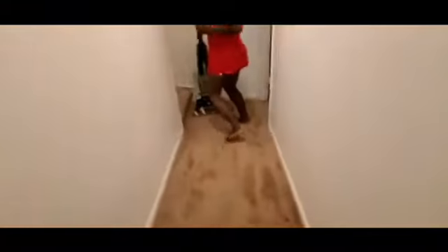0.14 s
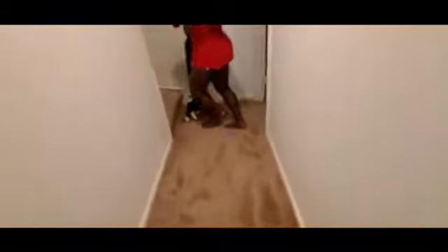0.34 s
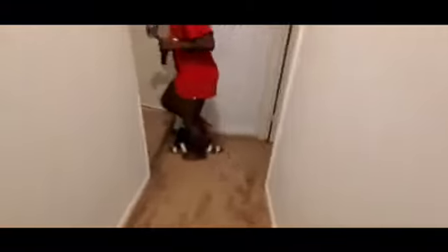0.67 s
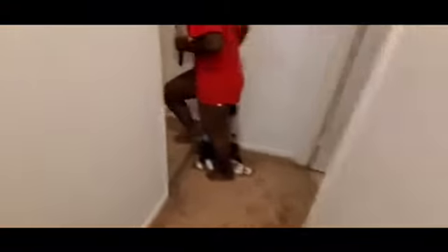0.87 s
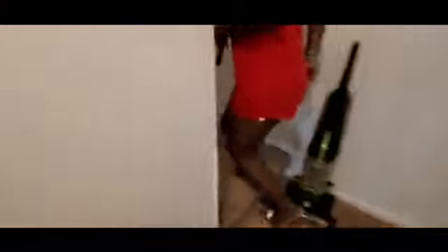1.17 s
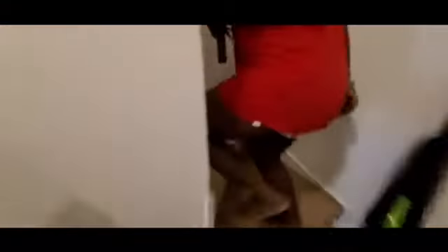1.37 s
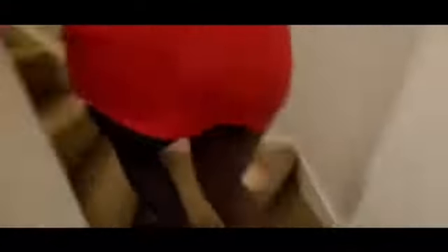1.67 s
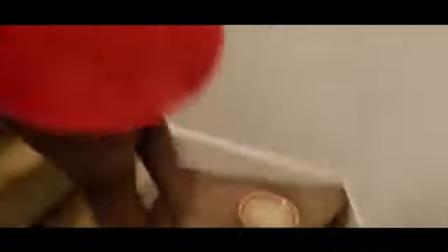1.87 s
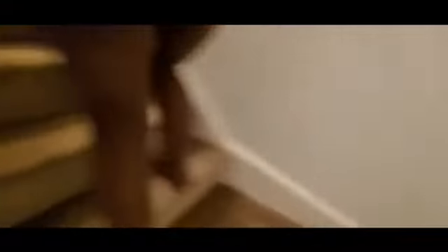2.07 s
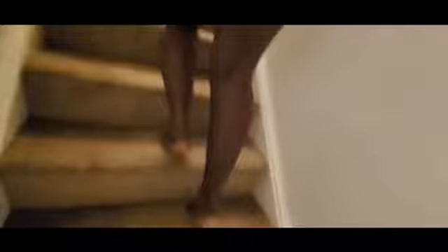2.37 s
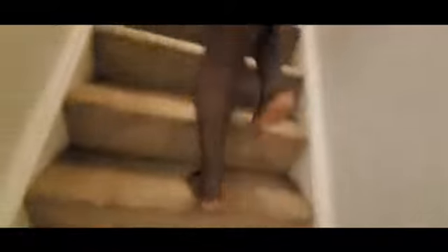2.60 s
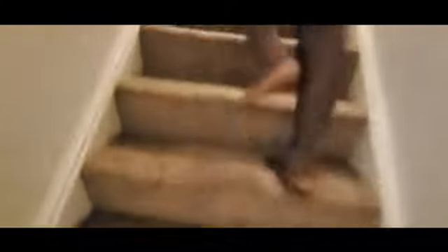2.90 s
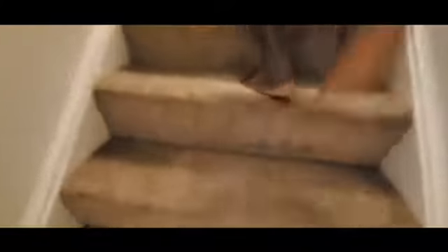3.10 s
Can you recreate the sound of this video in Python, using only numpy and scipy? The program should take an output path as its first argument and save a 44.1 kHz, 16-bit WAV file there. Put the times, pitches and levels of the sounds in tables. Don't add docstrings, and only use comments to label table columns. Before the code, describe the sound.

Soft footfalls and faint scuffs come first, then a few board knocks, then a dense run of hollow stair thumps and creaky cracks, with low handling rumble and a short indoor echo on a phone microphone.

```python
import sys
import numpy as np
from scipy import signal
from scipy.fft import rfft, irfft
from scipy.io import wavfile
from scipy.ndimage import uniform_filter1d

SR = 44100
rng = np.random.default_rng(int(sys.argv[2]) if len(sys.argv) > 2 else 0)


def makeup_ratio(level_db):
    decades = np.asarray(level_db, float) / 20
    return 10 ** decades


def generate_wav(sig):
    pcm = np.round(np.clip(np.atleast_2d(sig).T, -1, 1) * 32767).astype(np.int16)
    wavfile.write(sys.argv[1], SR, pcm)


N = 143325


def colour(x, points):
    p = np.array(points, float)
    size = 4096
    hz = np.maximum(np.arange(size // 2 + 1) * SR / size, 1)
    level_db = np.interp(np.log(hz), np.log(p[:, 0]), p[:, 1], -70, -70)
    cepstrum = irfft(level_db * np.log(10) / 20)
    cepstrum[1:size // 2] *= 2
    cepstrum[size // 2 + 1:] = 0
    ir = irfft(np.exp(rfft(cepstrum)))
    ir = ir / np.sqrt(np.sum(ir ** 2))
    return signal.fftconvolve(x, ir[None], axes=1)[:, :N]


def walk(rate):
    hold = int(SR / rate)
    steps = np.repeat(rng.standard_normal(N // hold + 1), hold)
    return uniform_filter1d(steps, hold)[:N]


def ports(alike):
    alike = np.clip(alike, 0, 1)
    noise = rng.standard_normal((3, N))
    return np.sqrt(alike) * noise[0] + np.sqrt(1 - alike) * noise[1:]


def add(out, s, x):
    i = max(int(s * SR), 0)
    out[..., i:i + x.shape[-1]] += x[..., :N - i]


def left_right(pan_db):
    return makeup_ratio(np.array([[pan_db], [-pan_db]]) / 2)


def hush_and_handling():
    # f/Hz, level/dB
    hush_tone = [(120, -62), (200, -30), (424, -4), (883, -12), (7410, -18.5), (9230, -20.5), (13300, -14),
                 (16000, -15)]
    # t/s, level/dB
    shake_level = [
        (0, -55),
        (.5, -44.5),
        (.9, -45),
        (1.2, -47.5),
        (1.7, -38.5),
        (1.9, -49),
        (2.3, -41),
        (2.6, -42.5),
        (3.1, -38),
    ]
    # f/Hz, level per Hz/dB
    shake_tone = [(11, -32), (18, -7.5), (39, 8), (119, -12.5), (152, -16), (260, -34), (340, -85),
                  (570, -120)]
    shake_db = np.interp(np.arange(N) / SR, *np.array(shake_level).T)
    shake_db = shake_db + 2.5 * walk(20)
    hush = makeup_ratio(-58.56 + walk(3.26)) * colour(ports(0.043), hush_tone)
    return hush + makeup_ratio(shake_db + 2.5) * colour(ports(0.77), shake_tone)


def knocks():
    # t/s, peak level/dB, main pitch f/Hz, ring/s
    board_knocks = [(0.009, -45, 140, 0.075), (.336, -54, 202, 0.11), (0.946, -36.5, 314, 0.11),
                    (1.424, -25, 280, 0.081), (1.442, -28.5, 249, 0.039), (1.574, -24.5, 198, 0.05),
                    (1.596, -29.5, 250, 0.062), (1.979, -41.5, 148, 0.092), (2.018, -32.5, 446, 0.02),
                    (2.027, -30, 298, 0.02), (2.045, -29.5, 336, 0.038), (2.073, -27.5, 500, 0.048),
                    (2.133, -36.5, 309, 0.051), (2.247, -29, 383, 0.057), (2.269, -33.5, 298, 0.064),
                    (2.388, -38, 165, 0.066), (2.437, -21.5, 352, .035), (2.482, -24, 340, 0.034),
                    (2.5, -21, 356, 0.047), (2.517, -18, 342, 0.033), (2.544, -17.5, 390, 0.06),
                    (2.58, -31, 245, 0.066), (2.626, -29, 274, 0.066), (2.682, -19.5, 360, 0.061),
                    (2.694, -20, 292, 0.054), (2.705, -23.5, 445, 0.035), (2.745, -25, 327, 0.045),
                    (2.768, -24, 400, 0.11), (2.787, -16, 304, 0.023), (2.798, -25.5, 163, 0.11),
                    (2.859, -32, 149, 0.082), (2.89, -29, 298, 0.053), (2.958, -32, 256, 0.064),
                    (3.018, -27.5, 641, 0.055), (3.054, -26.5, 506, 0.053), (3.204, -32, 295, 0.035)]
    board_hz = [151.3, 191.5, 245, 288.4, 345.4, 396.8, 462, 527.4, 580, 678]
    focus, push_s = 2.19, 0.0026
    out, t = np.zeros((2, N)), np.arange(int(.4 * SR)) / SR
    chance = rng.standard_normal((len(board_knocks), 4, len(board_hz), 1))
    for (s, db, pitch_hz, ring_s), c in zip(board_knocks, chance):
        hz = np.array(board_hz, float)[:, None] * (1 + 0.034 * c[0])
        gain = makeup_ratio(2 * c[1]) / (1 + (focus * np.log2(hz / pitch_hz)) ** 2) ** 0.49
        ring = np.exp(-np.log(1000) * t * (hz / 300) ** 0.95 / ring_s)
        ring = ring * (1 - np.exp(-t / push_s))
        sides = []
        for side in (-1, 1):
            phase = c[2] / 2 + side * c[3] * hz * hz / 900000
            sides.append(np.sum(gain * ring * np.sin(2 * np.pi * hz * t + phase), axis=0))
        both = np.array(sides)
        add(out, s, both * makeup_ratio(db + 1.5) / np.abs(both).max())
    return out


def swishes():
    # middle t/s, length/s, cloth level/dB, carpet level/dB
    brushes = [(0.024, 0.16, -54.5, -50.5), (0.408, 0.1, -51.5, -55.5), (0.213, 0.19, -57, -65.5),
               (0.574, 0.2, -50.5, -61.5), (0.962, 0.2, -59.5, -58), (1.093, 0.049, -55.5, -61),
               (1.435, 0.041, -58, -48), (1.496, 0.13, -52, -46.5), (1.595, 0.069, -54.5, -49),
               (1.673, 0.085, -42, -61), (1.736, 0.12, -48, -58), (1.91, 0.19, -53.5, -63.5),
               (2.062, 0.11, -57, -49.5), (2.163, 0.079, -45.5, -59), (2.302, .08, -54, -60),
               (2.242, 0.062, -54, -45.5), (2.458, 0.16, -48.5, -48), (2.548, 0.057, -46, -50.5),
               (2.67, 0.091, -50.5, -40.5), (2.798, 0.13, -50, -47.5), (2.87, 0.061, -71, -48.5),
               (3.04, 0.25, -51.5, -49), (3.196, 0.071, -53, -74)]
    # f/Hz, level/dB
    cloth_tone = [(2400, -14), (3300, -11.5), (7500, -2.5), (9200, -10), (11600, 0), (14500, -0.5),
                  (16200, -8)]
    # f/Hz, level/dB
    carpet_tone = [(180, -46), (300, 3.5), (813, -12), (1850, -6), (2920, -20), (4000, -25.5), (5200, -84),
                   (8800, -120)]
    t, cloth, carpet = np.arange(N) / SR, 0, 0
    for s, length, cloth_db, carpet_db in brushes:
        swell = np.exp(-(2 * (t - s) / length) ** 2)
        cloth = cloth + makeup_ratio(cloth_db) * swell
        carpet = carpet + makeup_ratio(carpet_db) * swell
    fine, coarse = makeup_ratio(2 * walk(120)), makeup_ratio(2.5 * walk(130))
    return (colour(cloth * fine * ports(0.09), cloth_tone)
            + colour(carpet * coarse * ports(0.22), carpet_tone))


def thumps():
    # peak t/s, level/dB, pitch f/Hz, width/s, left
    # minus right/dB
    low_thumps = [(.125, -33, 54, 0.02, 21), (0.472, -29.5, 60, 0.021, -26), (0.65, -21, 78, 0.0098, -40),
                  (0.715, -26, 56, 0.015, -27), (1.13, -31.5, 55, 0.0065, 13), (1.159, -30, 61, 0.012, 8),
                  (1.188, -37.5, 45.4, 0.034, 21), (1.231, -34.5, 48.6, 0.018, 25), (1.636, -38, 75, 0.017, 0),
                  (1.666, -34, 64.6, 0.055, 7), (1.721, -27, 54.2, 0.028, 3), (1.987, -31.5, 80, 0.0057, 14),
                  (1.999, -33.5, 67, 0.023, 13), (2.06, -22, 62.7, 0.047, -1.5), (2.095, -26, 45, 0.015, 1),
                  (2.228, -26.5, 70, 0.0047, 1), (2.24, -17.5, 72.5, 0.015, -3), (2.2608, -16, 119.6, 0.011, -1),
                  (2.296, -26.5, 74, 0.0038, -2), (2.413, -24.5, 57, 0.016, -3), (2.452, -27.5, 47, 0.059, -3),
                  (2.504, -23.5, 65, 0.011, -1), (2.727, -11.5, 55.6, 0.031, -1),
                  (2.768, -20.5, 42.7, 0.035, -2), (2.857, -22, 62, 0.041, -4), (3.046, -17.5, 48.6, 0.022, -1),
                  (3.082, -28.5, 51, 0.018, 2), (3.122, -41, 44.7, 0.033, 0)]
    out, t = np.zeros((2, N)), np.arange(-.1 * SR, .1 * SR) / SR
    chance = rng.standard_normal((len(low_thumps), 2, 1))
    for (s, db, hz, width, pan_db), c in zip(low_thumps, chance):
        sides = left_right(pan_db)
        phase = .3 * (c - c.mean())
        swing = np.exp(-2.8 * (t / width) ** 2) * np.cos(2 * np.pi * hz * t + phase)
        add(out, s + t[0], makeup_ratio(db) * sides / sides.mean() * swing)
    return out


def scrapes():
    # t/s, length/s, level/dB, pitch f/Hz, bandwidth/Hz
    rubs = [(.356, 0.03, -37, 1990, 220), (.383, .065, -43, 2140, 250), (.357, .05, -47, 1500, 900),
            (1.66, .15, -46, 2150, 450), (1.648, .003, -27, 3200, 3000), (2.043, .007, -23, 1350, 1300),
            (3.054, .011, -26, 950, 900), (2.14, 0.022, -42, 1850, 280), (3.048, .05, -41, 12100, 270),
            (.338, 0.24, -52, 470, 155), (.95, 0.11, -44, 154, 19), (2.746, 0.013, -33, 800, 700),
            (2.05, .04, -41, 1500, 900), (2.767, 0.025, -34, 900, 700), (2.44, .03, -38, 1900, 600),
            (1.49, .05, -46, 1900, 1200), (2.08, .14, -46, 11800, 1500), (1.6, .17, -42, 190, 110),
            (3.215, .06, -42, 220, 120), (2.79, .025, -37, 2000, 700), (2.42, .14, -41, 1300, 1500)]
    out, grip = np.zeros((2, N)), ports(.5) * makeup_ratio(2 * walk(150))
    for s, length, db, hz, width in rubs:
        rub = grip[:, int(s * SR):int((s + 2 * length) * SR)]
        middle = rub.mean(0)
        rub = middle + min(hz / 700, 1) * (rub - middle)
        rub = rub * makeup_ratio(-14 * (np.arange(rub.shape[1]) / SR / length) ** 1.3)
        b, a = signal.iirpeak(hz, hz / width, SR)
        sung = signal.lfilter(b, a, signal.lfilter(b, a, rub))
        add(out, s, makeup_ratio(db) * np.sqrt(SR / width / np.pi) * sung)
    return out


def decay(t60):
    t = np.arange(int(.4 * SR)) / SR
    return makeup_ratio(-60 * t / t60) + makeup_ratio(-10 - 60 * t / t60 / 2.6)


def cracks():
    # t/s, peak level/dB, treble share/dB
    slips = [(0.358, -46, 1), (1.424, -37, -11), (1.648, -55.5, 23.5), (1.652, -55.5, 28.5),
             (2.027, -43, -2.5), (2.043, -35.5, -13), (2.078, -53.5, 8), (2.136, -40, -11),
             (2.145, -48.5, 8), (2.261, -63, 18), (2.38, -41, -2.5), (2.383, -32.5, -4), (2.421, -41, -0.5),
             (2.436, -33.5, -12), (2.47, -46, 3.5), (2.482, -26.5, -7.5), (2.5, -31.5, -2.5),
             (2.518, -26.5, -3), (2.542, -25, -5.5), (2.628, -36.5, -4.5), (2.667, -34.5, -13),
             (2.683, -27.5, -13), (2.702, -36, -2), (2.788, -25.5, -8.5), (2.862, -33.5, -21),
             (2.885, -35, -3), (3.019, -32.5, -5.5), (3.177, -60.5, 18), (3.205, -35, -12)]
    # f/Hz, level/dB
    wood_tone = [(350, 4.5), (600, 2), (892, -4), (1700, -5.5), (2400, -4.5), (2980, -20), (4000, -25),
                 (8800, -120)]
    # f/Hz, level/dB
    tick_tone = [(880, -91), (1500, -5.5), (2880, -9.5), (4550, -11), (7540, -5), (9190, -11), (16000, -1)]
    low, high, snap = np.zeros(N), np.zeros(N), np.zeros((2, N))
    grit_fall, tick_fall = decay(.035), decay(.022)
    for s, db, treble_db in slips:
        add(low, s, makeup_ratio(db - 3) * grit_fall)
        add(high, s, makeup_ratio(db + treble_db + 1.02) * tick_fall)
        add(snap, s, makeup_ratio(np.array([[db + 10.5], [db + treble_db + 17]])))
    wood = colour(low * ports(0.13) + snap[0], wood_tone)
    ticks = colour(high * ports(0.033) + snap[1], tick_tone)
    return wood + left_right(-3) * ticks


def hallway(hits):
    t60_s, dull_hz = 0.21, 2900
    t = np.arange(int(.6 * SR)) / SR
    tail = rng.standard_normal((2, len(t))) * makeup_ratio(-60 * t / t60_s) * (t > .004)
    tail = signal.sosfilt(signal.butter(1, dull_hz, fs=SR, output="sos"), tail)
    tail = tail / np.sqrt(np.sum(tail ** 2) / 2)
    return signal.fftconvolve(hits, tail, axes=1)[:, :N]


def scene():
    port_lag_s, right_db = 0.00028, -0.82
    hits = knocks() + scrapes() + cracks()
    near = hits + swishes() + makeup_ratio(-12.5) * hallway(hits)
    near[1] = np.roll(near[1], int(port_lag_s * SR))
    return (near + thumps() + hush_and_handling()) * makeup_ratio(np.array([[0], [right_db]]))


def low_pass(x):
    return signal.sosfilt(signal.butter(12, 16820, fs=SR, output="sos"), x)


def record(dry):
    top = signal.cheby2(12, 50, 16150, fs=SR, output="sos")
    return low_pass(signal.sosfilt(top, dry))


dry = scene()
out = record(dry)
generate_wav(out)
```